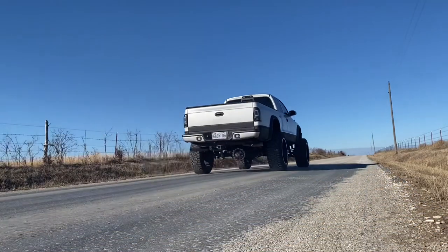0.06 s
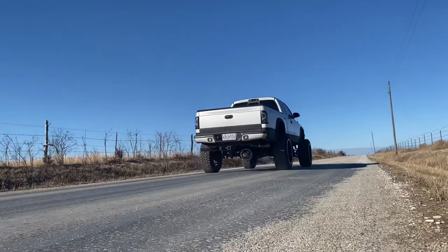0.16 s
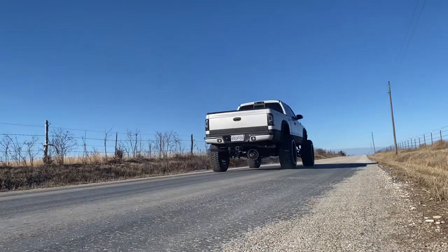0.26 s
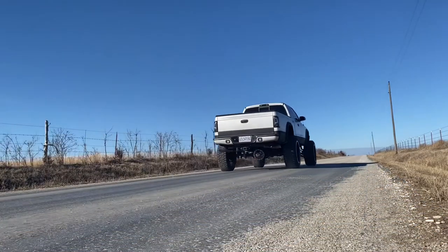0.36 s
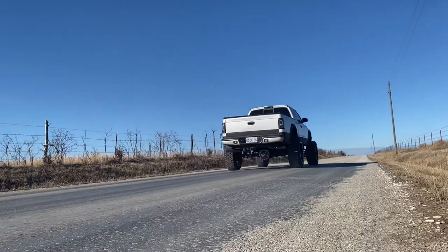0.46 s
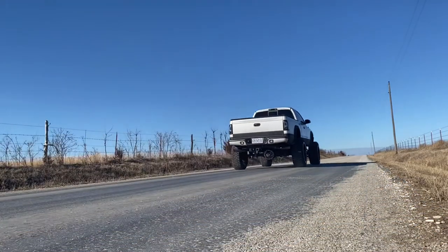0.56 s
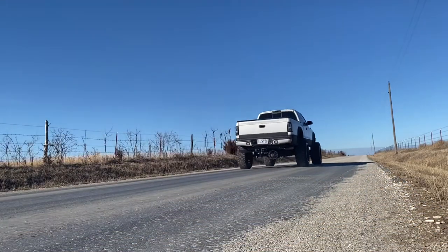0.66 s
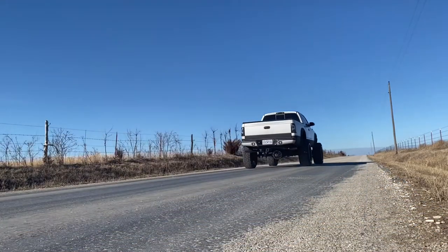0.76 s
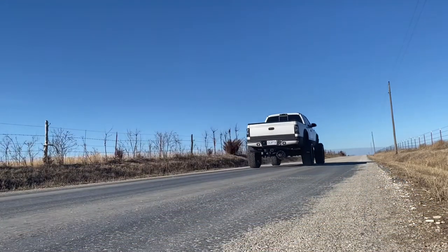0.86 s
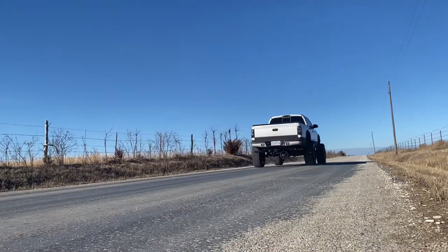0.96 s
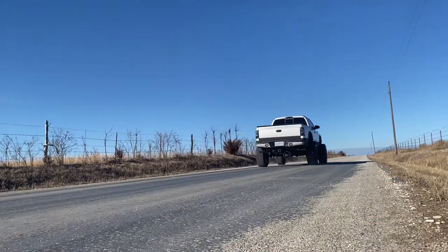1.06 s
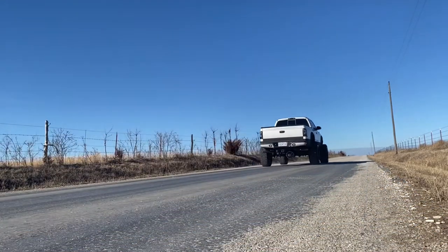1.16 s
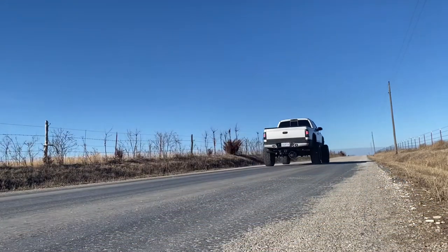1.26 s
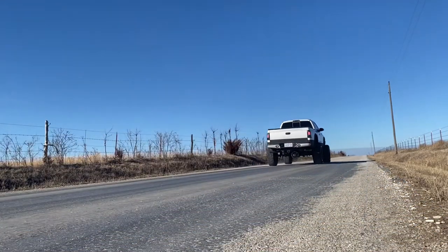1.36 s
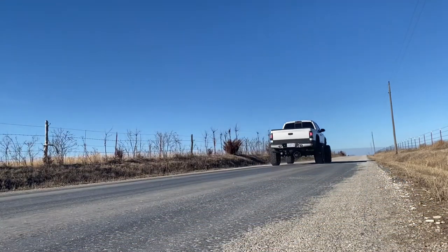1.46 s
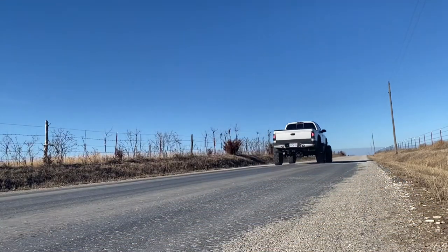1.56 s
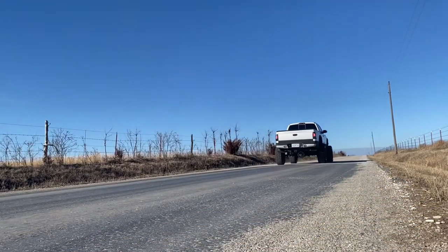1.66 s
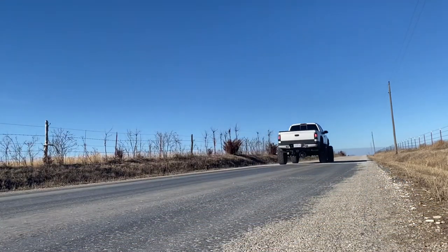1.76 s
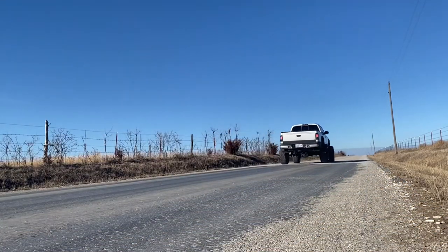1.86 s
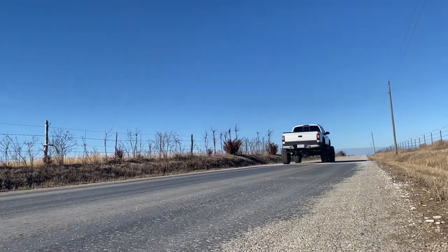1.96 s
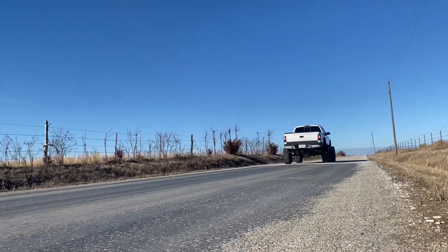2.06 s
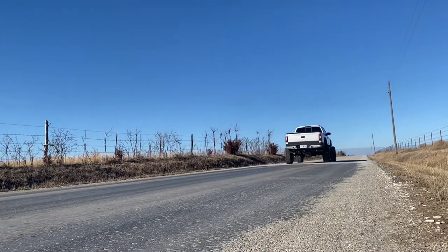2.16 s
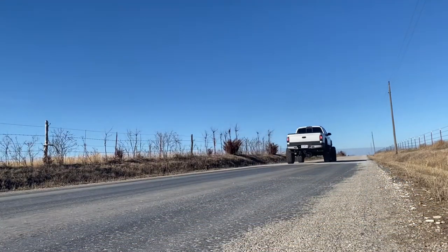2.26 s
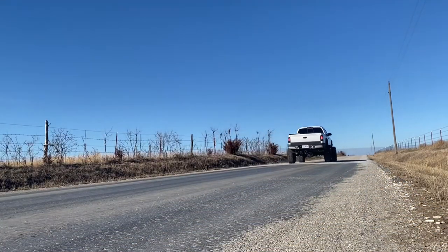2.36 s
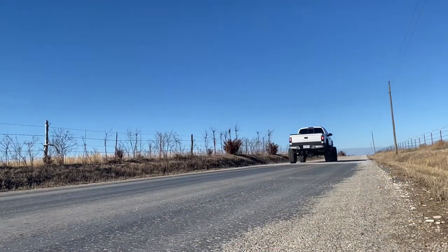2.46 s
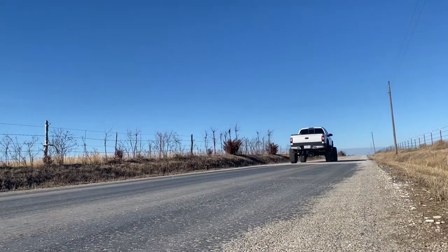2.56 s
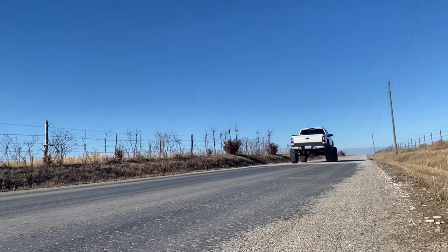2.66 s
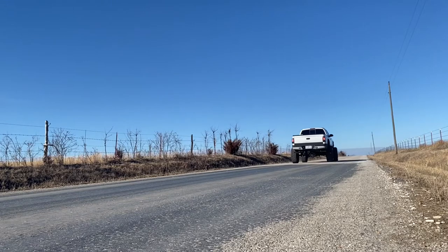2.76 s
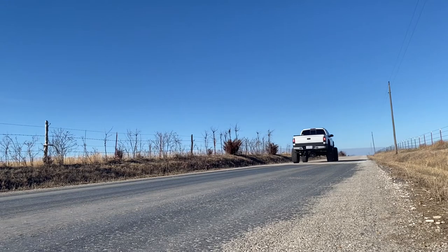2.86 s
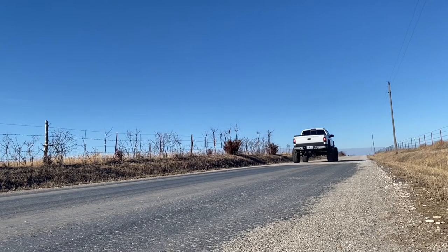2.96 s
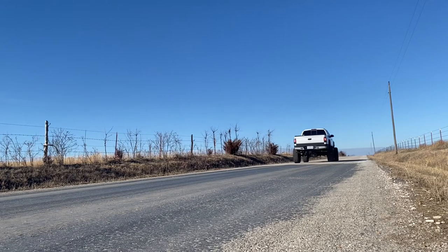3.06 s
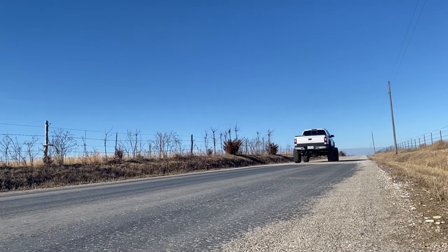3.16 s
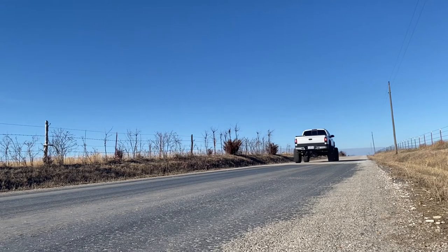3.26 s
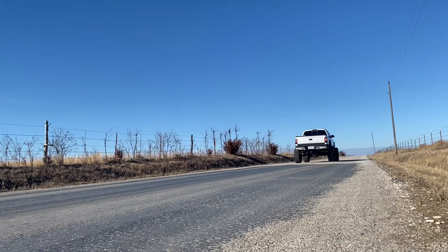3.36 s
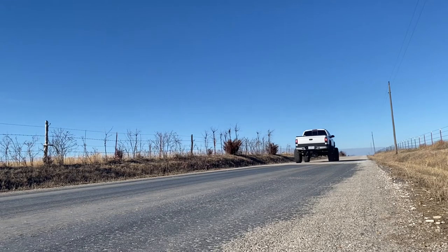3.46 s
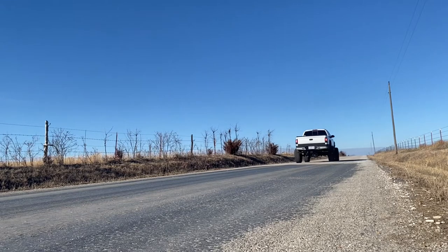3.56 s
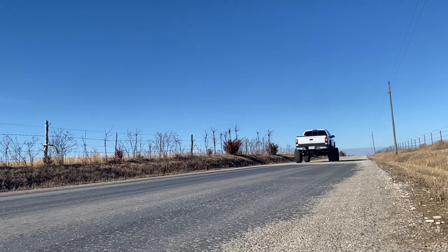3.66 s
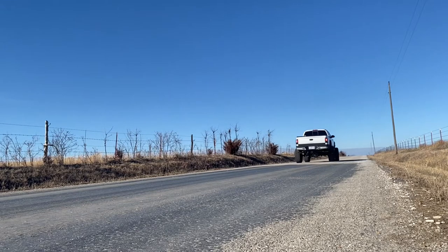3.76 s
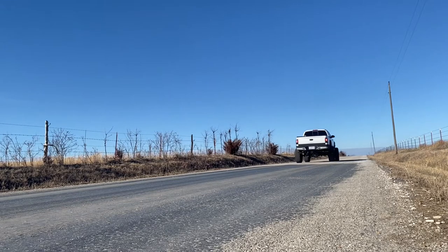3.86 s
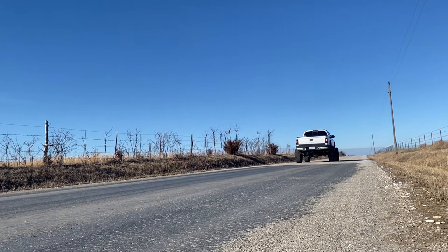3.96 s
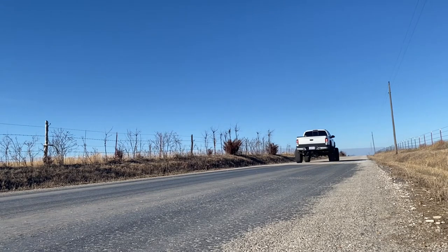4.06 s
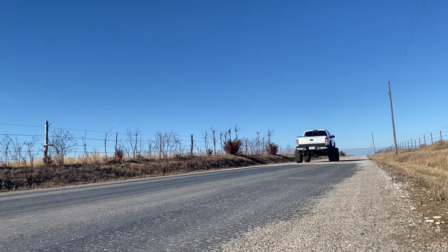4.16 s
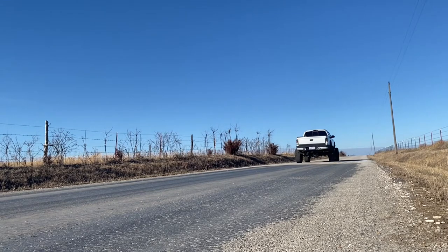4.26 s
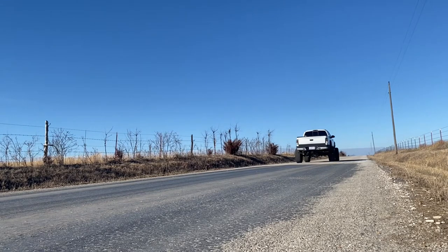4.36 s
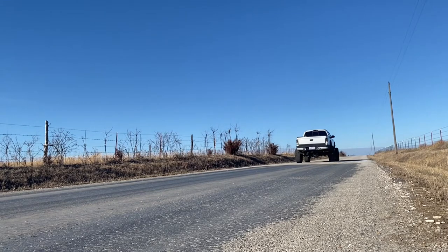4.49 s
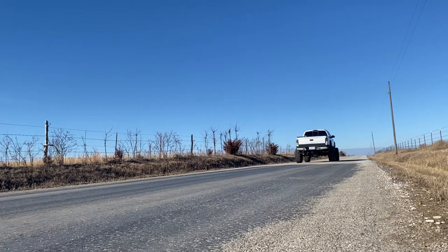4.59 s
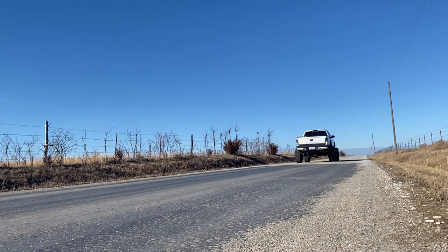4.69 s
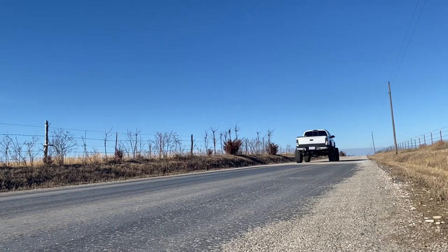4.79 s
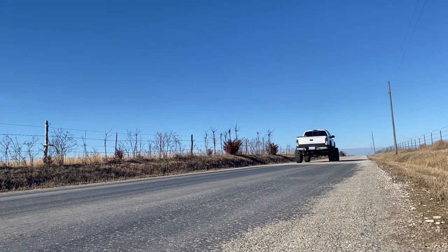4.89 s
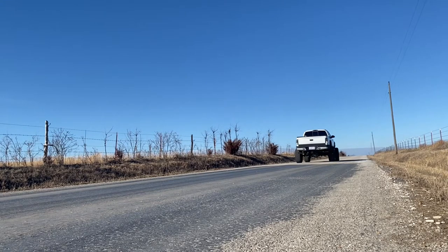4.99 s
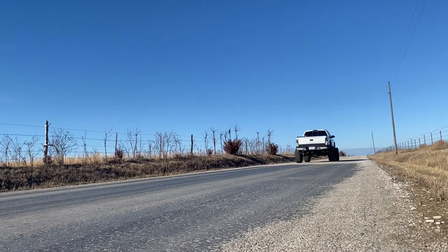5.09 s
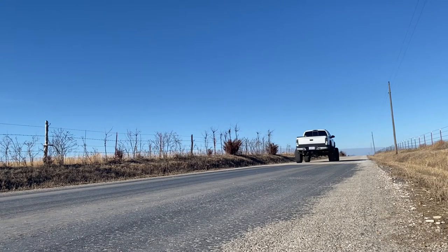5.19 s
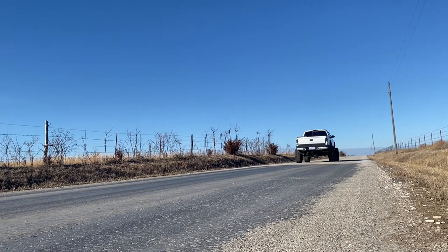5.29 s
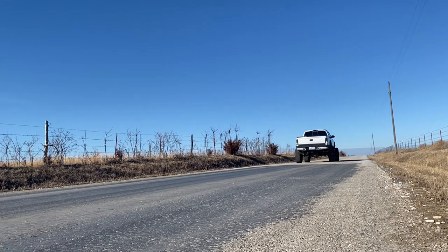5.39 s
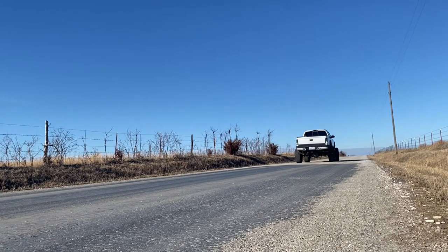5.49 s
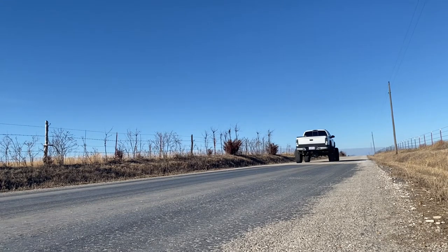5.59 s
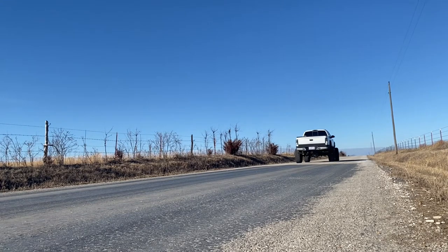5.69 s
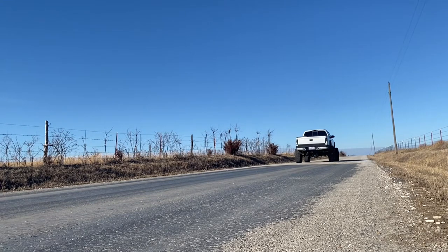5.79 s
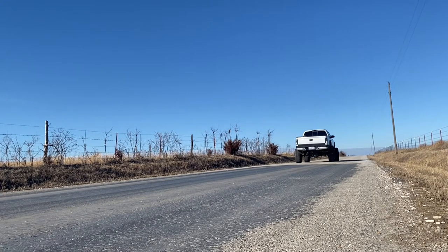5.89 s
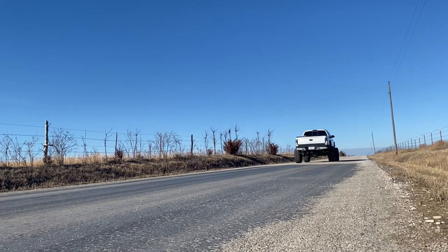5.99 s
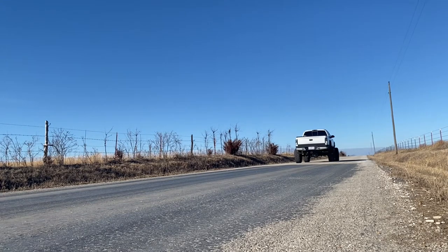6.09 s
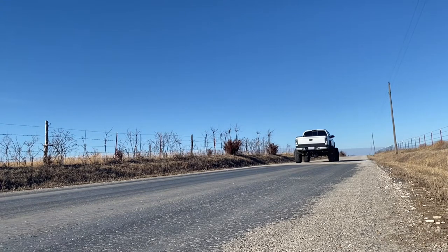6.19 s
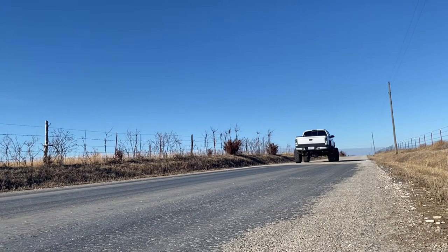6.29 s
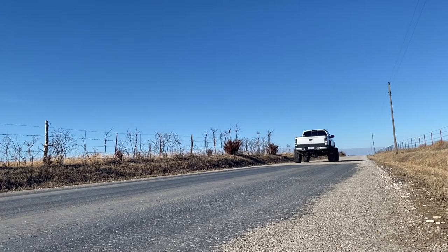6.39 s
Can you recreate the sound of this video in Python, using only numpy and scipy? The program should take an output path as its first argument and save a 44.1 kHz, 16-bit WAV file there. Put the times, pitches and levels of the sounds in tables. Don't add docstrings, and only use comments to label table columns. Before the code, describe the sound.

Outdoors on an open country road, a big diesel pickup pulls away from a stationary microphone. Low exhaust drone, tyre hiss and gritty rolling fade as it slows, with a small brake squeak early on. Wind rumbles and flutters heavily against the microphone. The truck then idles at a distance with metallic knocking, revs up once and drops, and starts a second, sharper rev at the end.

```python
import sys
import numpy as np
from scipy import signal
from scipy.fft import rfft, irfft, next_fast_len
from scipy.io import wavfile
from scipy.ndimage import uniform_filter1d

SR = 44100
rng = np.random.default_rng(int(sys.argv[2]) if len(sys.argv) > 2 else 0)


def rack_gain(trim_db):
    fader = np.asarray(trim_db, float)
    return 10 ** (fader / 20)


def output_pcm(signal):
    pcm = np.clip(np.atleast_2d(signal).T, -1, 1) * 32767
    wavfile.write(sys.argv[1], SR, np.round(pcm).astype(np.int16))


N = 284004
T = np.arange(N) / SR
PAD = 4096
HZ = np.maximum(np.fft.rfftfreq(next_fast_len(N + 2 * PAD), 1 / SR), 1)
KNOCK_IDLE_DB = -59.5
IN_VIEW_S = 3.4


def rms_one(x):
    return x / np.sqrt(np.mean(x ** 2) + 1e-20)


def even(x, seconds):
    return x / np.sqrt(uniform_filter1d(x ** 2, int(seconds * SR)) + 1e-20)


def curve(rows):
    s, value = np.transpose(rows)
    return np.interp(T, s, value)


def drift(rate):
    r = np.exp(-80 * np.pi * rate / SR)
    slow = signal.lfilter([1], [1, -2 * r, r * r], rng.standard_normal(N // 40 + 2002))[2000:]
    return np.interp(np.arange(N) / 40, np.arange(len(slow)), rms_one(slow))


def through(x, response):
    size = next_fast_len(N + 2 * PAD)
    padded = np.pad(x, (PAD, size - N - PAD), mode="reflect")
    return irfft(rfft(padded) * response, size)[PAD:PAD + N]


def colour(x, points):
    hz, db = np.transpose(points)
    return through(x, rack_gain(np.interp(np.log(HZ), np.log(hz), db)))


def resonate(x, modes):
    out = 0
    for k, (hz, width_hz, db) in enumerate(modes):
        r = np.exp(-np.pi * width_hz / SR)
        ring = signal.lfilter([1, 0, -1], [1, -2 * r * np.cos(2 * np.pi * hz / SR), r * r], x)
        out = out + (-1) ** k * rack_gain(db) * (1 - r * r) * ring
    return out


def exhaust(firings, boom_db, upper_db):
    bank_db = [-1, -6, -7, -3, -10, 0, -3, -9]
    # pitch in Hz, width in Hz, level in dB.
    pipe_low = [(60, 25, -22), (112, 25, -17), (158, 11, 2), (182, 24, -11), (235, 30, -26)]
    pipe_high = [(233, 24, 2), (262, 18, 3), (300, 30, -3), (352, 30, -2), (470, 22, 0), (501, 20, 3),
                 (610, 90, -4)]
    rough_low, rough_high = .2, .55
    loud_firing = .57
    speed_hz = np.gradient(firings) * SR

    cycle = 2 * np.pi * firings[::8] / 8
    start = rng.uniform(0, 2 * np.pi, 80)
    orders = sum(rack_gain(bank_db[k % 8]) * np.sin(k * cycle + start[k]) for k in range(4, 80))
    orders = rms_one(np.interp(np.arange(N), np.arange(0, N, 8), orders))
    steep = signal.butter(2, 800, fs=SR, output="sos")
    dull = signal.butter(2, 700, fs=SR, output="sos")
    flow = rms_one(signal.sosfilt(dull, rng.standard_normal(N)))
    low = even(resonate(orders + rough_low * flow, pipe_low), 0.092)
    high = even(resonate(orders + rough_high * flow, pipe_high), 0.16)

    idling = np.clip((47.5 - speed_hz) / 1.5, 0, .85)
    hum = np.sqrt(2) * np.sin(29 * 2 * np.pi * firings / 8)
    whine = np.sqrt(2) * np.sin(89 * 2 * np.pi * firings / 8)
    low = (1 - idling) * low + idling * hum
    high = (1 - .4 * idling) * high + rack_gain(-6) * idling * whine

    depth_db = 0.24 * np.maximum(speed_hz - 48, 0)
    throb_db = depth_db * np.cos(2 * np.pi * (firings / 8 - loud_firing))
    return signal.sosfilt(steep, rack_gain(boom_db + throb_db + 0.5) * low + rack_gain(upper_db + 6.5) * high)


def block(firings, knock_db, ring_db):
    # pitch in Hz, width in Hz, level in dB.
    block_low = [(731.2, 21, 10), (840, 81, 7), (1054, 40, 5), (1212, 98, 0.5)]
    block_high = [(2000, 230, -4), (2140, 420, 0), (2870, 260, -11), (3760, 240, -15), (4200, 500, -15),
                  (5250, 600, -23), (6100, 1200, -30), (7200, 1500, -28), (10800, 2500, -35)]
    shared_db, own_db = 2, 2.6
    treble_db_per_octave = -0.24

    which, since = firings.astype(int), firings % 1
    chance = rng.standard_normal((len(block_high) + 1, which[-1] + 1))
    burst = np.sqrt(8 * since) * np.exp(-4 * since)
    gate = rack_gain(shared_db * chance[0][which]) * burst
    high = 0
    for (hz, width_hz, db), own in zip(block_high, chance[1:]):
        steady = .3 + .2 * (hz > 5000)
        knocks = rng.standard_normal(N) * (gate * rack_gain(own_db * own[which]) + steady)
        mode = [(hz, width_hz, 0)]
        ring = rms_one(resonate(resonate(knocks, mode), mode))
        octaves = np.log2(hz / block_high[0][0])
        tilt_db = treble_db_per_octave * (knock_db - KNOCK_IDLE_DB) * octaves
        high = high + rack_gain(db + tilt_db) * ring
    low = resonate(rng.standard_normal(N) * gate + 0.44 * rng.standard_normal(N), block_low)
    low = signal.sosfilt(signal.butter(8, 1380, fs=SR, output="sos"), low)
    return rack_gain(knock_db - 4.5) * even(high, 0.31) + rack_gain(ring_db) * even(low, 0.24)


def tyres():
    # time in seconds, level in dB.
    roll = [(0, -39.5), (.5, -42), (1.0, -45), (1.5, -45.5), (2.0, -50), (2.5, -49), (2.75, -55),
            (3.1, -61.5), (6.44, -57)]
    # pitch in Hz, level in dB per Hz.
    tyre_tone = [(250, -24.5), (500, -2.5), (850, -10.5), (1430, -17.5), (2000, -17.5), (2600, -25.5),
                 (3400, -30), (4300, -31.5), (5800, -41), (7200, -39.5), (10500, -43), (15000, -53),
                 (18000, -99)]
    grit_per_s, grit = 300, .2
    hits = rng.random(N) < grit_per_s / SR
    sizes = rack_gain(4.9 * np.minimum(rng.exponential(1, N), 5))
    grains = hits * sizes * rng.choice([-1, 1], N)
    hiss = rms_one(colour(rng.standard_normal(N) + grit * rms_one(grains), tyre_tone))
    return rack_gain(curve(roll) + .7 * drift(9)) * hiss


def intake_rush(knock_db):
    # pitch in Hz, level in dB per Hz.
    rush_tone = [(3500, -28.5), (4600, -0.5), (5400, 4), (6800, -5.5), (8000, -11), (11000, -11),
                 (12400, -13.5), (13500, -51)]
    level_db = -86.5 + 1.3 * (knock_db - KNOCK_IDLE_DB) + 2.4 * drift(6.7)
    return rack_gain(level_db) * rms_one(colour(rng.standard_normal(N), rush_tone))


def roadside_air():
    # pitch in Hz, level in dB per Hz.
    air_tone = [(250, -10), (500, 0), (1000, -5), (1600, -16), (2300, -21), (3300, -30), (6000, -37),
                (7500, -35), (12000, -45), (13800, -72)]
    return rack_gain(-61) * rms_one(colour(rng.standard_normal(N), air_tone))


def buffeted(steady_db, crest_s, crest_db, rise, fall):
    coarse = T[::32]
    since = coarse - crest_s[:, None]
    peaks_db = crest_db[:, None] + np.where(since < 0, rise * since, -fall * since)
    return rack_gain(np.maximum(steady_db, np.interp(T, coarse, peaks_db.max(axis=0))))


def wind():
    # time in seconds, rumble level in dB.
    breeze = [(0, -26), (1.2, -27), (1.6, -26), (2.3, -24.5), (2.8, -22.5), (2.85, -35.5), (3.13, -37.5),
              (3.45, -36.5), (3.55, -30.5), (3.95, -37), (4.2, -34), (4.7, -30), (5.0, -31), (5.35, -32.5),
              (5.6, -26.5), (5.88, -40.5), (5.97, -29.5), (6.44, -33)]
    # crest in seconds, rumble level in dB, flutter level in dB.
    buffets = [(0.01, -16, -29.5), (0.09, -25, -23.5), (0.23, -20, -38), (0.36, -15.5, -49),
               (0.64, -22.5, -40.5), (1.0, -19, -34), (1.13, -28, -37.5), (1.26, -28, -44),
               (1.4, -29, -26.5), (1.489, -19.5, -39), (1.579, -19, -43), (1.651, -30, -31.5),
               (1.78, -18.5, -29), (1.99, -16.5, -23), (1.85, -19.5, -31), (2.09, -18, -27),
               (2.3, -23.5, -38), (2.42, -20.5, -31), (2.506, -30, -18.5), (2.549, -14.5, -22),
               (2.61, -22.5, -18), (2.7, -22, -31), (2.745, -18.5, -21), (2.79, -21.5, -28),
               (2.89, -26, -36.5), (2.98, -29.5, -36), (3.025, -32, -39), (3.075, -30.5, -35),
               (3.499, -30, -30), (3.62, -25, -27), (3.52, -38, -30.5), (3.745, -31.5, -28),
               (3.775, -30, -26), (3.81, -34, -28.5), (3.841, -38, -24.5), (3.89, -25, -24),
               (3.917, -24.5, -23), (3.945, -23, -29.5), (4.01, -29.5, -33), (4.08, -27, -42),
               (4.37, -29.5, -34.5), (4.48, -28.5, -33.5), (4.62, -34, -27.5), (4.76, -33, -25),
               (4.97, -26.5, -27.5), (5.14, -24, -28.5), (5.2, -36, -27.5), (5.48, -36, -23),
               (5.55, -35, -27), (5.63, -24.5, -35), (5.76, -27.5, -34), (5.911, -29, -32),
               (5.945, -35, -24.5), (6.27, -34, -29.5), (6.33, -31, -28.5), (6.37, -30, -28.5),
               (6.412, -21.5, -25)]
    # pitch in Hz, level in dB per Hz.
    rumble_tone = [(20, -33.5), (32, -15), (50, 6), (70, 6), (110, 5), (170, -5.5), (260, -24), (400, -59),
                   (900, -100)]
    flutter_tone = [(30, -60.5), (60, -22.5), (120, -11), (200, 0), (300, -10.5), (450, -24.5),
                    (600, -51.5), (1300, -100)]
    lumpy_db, own = 2.2, .3

    breeze_db = curve(breeze)
    crest_s, rumble_db, flutter_db = np.transpose(buffets)
    rumble = buffeted(breeze_db, crest_s, rumble_db, 156, 170)
    under_db = -36.5 + (breeze_db + 31) - 7.5 * (T < IN_VIEW_S)
    flutter = buffeted(under_db, crest_s, flutter_db + 1.5, 450, 500)

    def lumpy(tone):
        noise = even(colour(rng.standard_normal(N), tone), .12)
        return rms_one(rack_gain(lumpy_db * drift(14)) * noise)

    out = 0
    for tone, gain in ((rumble_tone, rumble), (flutter_tone, flutter)):
        mid, side = lumpy(tone), lumpy(tone)
        out = out + gain * (mid + own * side * np.array([[1], [-1]]))
    return out


def whistles():
    # start in seconds, end in seconds,
    # pitch in Hz, level in dB, left over right in dB.
    thin_tones = [
        (1.352, 1.415, 6918, -57, 7),
        (1.47, 1.53, 6960, -69, 6),
        (1.41, 1.427, 3770, -63, 0),
        (1.405, 1.432, 1900, -48, 2),
        (.155, .235, 3720, -63, 0),
        (4.7, 5.6, 11840, -89.5, 9.5),
        (4.7, 5.5, 12159, -87, 0),
        (5.28, 5.75, 10272, -84, -7),
                  (2.5, 3.97, 12159, -95, 0),
        (2.5, 3.97, 11840, -97, 4),
        (5.172, 5.187, 6250, -74, 4),
        (4.638, 4.652, 6400, -75, 4),
        (5.45, 5.66, 12159, -91, 0),
    ]
    out = np.zeros((2, N))
    for start, end, hz, db, pan_db in thin_tones:
        shape = np.clip(np.minimum(T - start, end - T) / (0.18 * (end - start)), 0, 1)
        level = rack_gain(db + 1.6 * drift(25))
        wavering_hz = hz * (1 + 0.0012 * drift(40))
        tone = shape * level * np.sin(2 * np.pi * np.cumsum(wavering_hz) / SR)
        out += tone * rack_gain([[pan_db / 2], [-pan_db / 2]])
    return out


def clunks():
    # start in seconds, peak level in dB, main pitch in Hz.
    hard_firings = [(1.196, -36, 705), (1.7, -38, 830), (2.573, -40.5, 840), (3.4, -39, 830),
                    (3.579, -42.5, 847), (3.888, -34.5, 777), (3.933, -32, 743), (4.062, -39, 840),
                    (4.383, -31, 760), (4.537, -31, 780), (4.682, -47.5, 820), (4.718, -29.5, 805),
                    (5.081, -31.5, 812), (6.022, -47, 807), (6.218, -30.5, 884)]
    out = np.zeros(N)
    age = np.arange(4000) / SR
    shape = (1 - np.exp(-age / .0004)) ** 3 * np.exp(-age / .005)
    for s, db, hz in hard_firings:
        out[int(s * SR):][:len(age)] += rack_gain(db) * shape * np.sin(2 * np.pi * hz * age)
    return out


def hard_knocks():
    # start in seconds, peak level in dB, pitch in Hz.
    knocks = [(3.1777, -52, 2140), (3.6227, -47, 2000), (3.6651, -45.5, 2010), (3.69, -50, 1950),
              (3.7095, -47, 1950), (3.7988, -42.5, 1960), (3.908, -51, 2070), (3.9315, -43.5, 2050),
              (3.9489, -48.5, 2220), (3.9973, -50, 1950), (4.0158, -48, 1940), (4.0407, -48, 2120),
              (4.0602, -43, 1990), (4.0806, -46, 2040), (4.143, -57, 1940), (4.2074, -46.5, 1850),
              (4.2832, -45, 2100), (4.3421, -49, 2350), (4.384, -49, 1990), (4.4024, -40.5, 2030),
              (4.4224, -42, 2080), (4.4583, -46, 1990), (4.4797, -53, 2190), (4.4962, -42, 2095),
              (4.5361, -50, 2120), (4.5521, -46, 2080), (4.588, -51.5, 2130), (4.6264, -44.5, 2200),
              (4.7821, -39.5, 2090), (4.8354, -51, 1980), (4.8659, -41, 1880), (4.9028, -43.5, 2120),
              (4.9512, -49, 2090), (4.9641, -42, 2240), (5.0305, -44, 2020), (5.0839, -42, 1940),
              (6.0437, -52, 1950), (6.0641, -41.5, 1960), (6.0851, -38, 1920), (6.12, -36, 2080),
              (6.139, -42, 2160), (6.1549, -34.5, 2070), (6.1834, -30.5, 2180), (6.2158, -49, 2260),
              (6.2298, -42, 2230), (6.2707, -36, 2320), (6.2971, -37, 2200), (6.3265, -35, 2020),
              (6.3525, -35, 2110), (6.4024, -36, 2245)]
    overtones = [(1.4, -15), (1.85, -17.5), (2.059, -21.5)]    # (multiple of 2060 Hz, dB)
    out = np.zeros(N + SR)
    age = np.arange(2000) / SR
    shape = (1 - np.exp(-age / .00087)) * np.exp(-age / .006)
    for (s, db, hz), chance in zip(knocks, rng.standard_normal((len(knocks), 5))):
        second_hz = hz * (1.09 + .02 * chance[0])
        ring = np.sin(2 * np.pi * hz * age)
        ring = ring + .6 * np.sin(2 * np.pi * second_hz * age + 3 * chance[1])
        for (multiple, over_db), own in zip(overtones, chance[2:]):
            ring = ring + rack_gain(over_db + 4 * own) * np.sin(2 * np.pi * 2060 * multiple * age)
        out[int(s * SR):][:len(age)] += rack_gain(db - 3) * shape * ring
    return out[:N]


def driveline_slack():
    # start in seconds, level in dB, length in seconds, highest pitch in Hz.
    slack = [
        (3.287, -63.5, 0.017, 4400),
        (3.737, -64, 0.04, 3900),
        (4.208, -47, 0.045, 1350),
        (4.208, -57, 0.05, 3000),
    ]
    out = np.zeros(N)
    age = np.arange(4000) / SR
    for s, db, length, top_hz in slack:
        band = signal.butter(6, [350, top_hz], "band", fs=SR, output="sos")
        scuff = rms_one(signal.sosfilt(band, rng.standard_normal(4000)))
        swell = np.sin(np.pi * np.minimum(age / length, 1))
        out[int(s * SR):][:len(age)] += rack_gain(db) * scuff * swell
    return out


def far(x):
    top = colour(x, [(12500, -80), (13500, 0)])
    loss_db = np.where(T < 6.1, -6 * T, -6) + 5 * drift(8)
    return x - top * (1 - rack_gain(loss_db))


def ports(x):
    # pitch in Hz, delay in radians.
    trail = [(30, 0), (150, .4), (600, .45), (1500, .3), (2200, .55), (3400, .35), (4300, .65), (5300, 2.1),
             (7000, .5), (9000, 1.7), (10000, 1.3), (13000, 1.0)]
    # pitch in Hz, left over right in dB.
    lean = [(60, -1), (300, 2), (600, -3), (1200, -2.5), (2200, 1), (4500, 3.5), (6800, 3.5), (9000, 0)]
    # pitch in Hz, level in dB.
    apart = [(100, -21), (400, -19), (1500, -22), (3500, -19), (5300, -12), (7000, -20), (9000, -12),
             (14000, -12)]
    hz, radians = np.transpose(trail)
    late = through(x, np.exp(-1j * np.interp(np.log(HZ), np.log(hz), radians)))
    left = colour(late, [(f, db / 2) for f, db in lean])
    right = colour(x, [(f, -db / 2) for f, db in lean])
    scatter = rng.standard_normal(9000) * np.exp(-np.arange(9000) / 2500)
    scattered = signal.fftconvolve(x, scatter / np.linalg.norm(scatter))[:N]
    diffuse = colour(scattered, apart)
    return np.array([left + diffuse, right - diffuse])


def scene():
    # time in seconds, firings per second.
    firing = [(0, 57.2), (.7, 57.2), (1.3, 62.3), (1.6, 65.7), (1.9, 66.2), (2.3, 61), (2.6, 54.3),
              (3.0, 46), (3.5, 44.3), (4.0, 45), (4.8, 59.2), (5.05, 61.4), (5.4, 61.2), (5.6, 59),
              (5.9, 46), (6.05, 46), (6.25, 61), (6.44, 65)]
    # time in seconds, block ring in dB.
    effort = [(0.04, -39), (0.4, -42), (1.1, -43.5), (1.8, -46.5), (2.26, -46.5), (2.59, -52), (2.92, -53),
              (3.6, -53), (4.03, -52.5), (4.44, -50), (4.85, -46.5), (5.05, -46.5), (5.57, -49.5),
              (5.86, -60), (5.97, -56), (6.09, -44), (6.2, -40), (6.44, -40)]
    # time in seconds, level in dB.
    drone = [(0, -19), (.36, -21.5), (1.07, -19.5), (1.14, -23), (1.6, -26), (2.59, -27), (3.0, -43),
             (3.16, -34), (3.62, -25), (4.03, -42), (4.44, -40.5), (4.9, -19.5), (5.5, -22.5),
             (5.68, -32.5), (6.1, -37), (6.18, -21.5), (6.28, -24), (6.36, -44)]
    speed_hz = curve(firing)
    firings = np.cumsum(speed_hz) / SR
    climb = uniform_filter1d(np.gradient(speed_hz) * SR, size=SR // 4)
    pulling = np.tanh(climb / 24)
    effort_db = curve(effort)
    above_db = effort_db + 52
    hidden = np.interp(T, [0.62, IN_VIEW_S], [1, 0])
    upper_db = -53 + 0.77 * above_db + 2 * hidden
    knock_db = KNOCK_IDLE_DB + 1.16 * above_db - 14 * hidden + 2.5 * pulling

    truck = exhaust(firings, curve(drone), upper_db) + block(firings, knock_db, effort_db)
    truck = truck + tyres() + intake_rush(knock_db)
    truck = truck + clunks() + hard_knocks() + driveline_slack()
    return ports(far(truck) + roadside_air()) + wind() + whistles()


def band_limit(x):
    return signal.sosfilt(signal.butter(12, 15720, fs=SR, output="sos"), x)


def record(dry):
    # pitch in Hz, level in dB.
    gaps_mid = [(8400, 0), (8700, -35), (9450, -35), (9600, 0), (12300, 0), (12500, -35), (13700, -35),
                (13900, 0)]
    gaps_side = [(10300, 0), (10900, -35), (11750, -35), (11850, 0), (14400, 0), (14600, -35)]
    limit = .5
    mid = colour(dry[0] + dry[1], gaps_mid) / 2
    side = colour(dry[0] - dry[1], gaps_side) / 2
    rounded = limit * np.tanh(np.array([mid + side, mid - side]) / limit)
    mix = signal.sosfilt(signal.butter(2, 25, "high", fs=SR, output="sos"), rounded)
    return band_limit(mix)


dry = scene()
out = record(dry)
output_pcm(out)
```